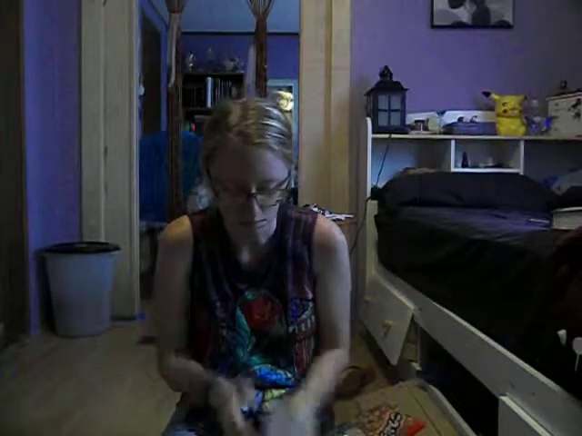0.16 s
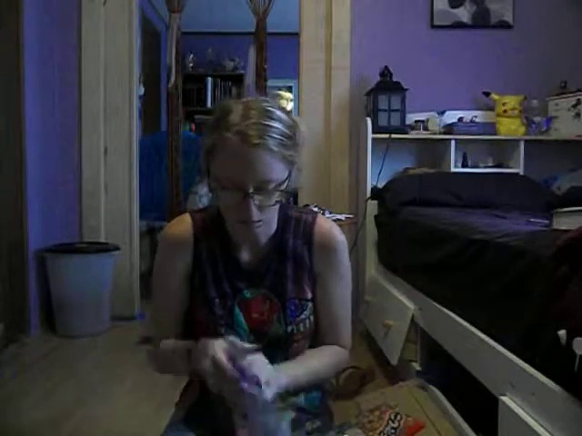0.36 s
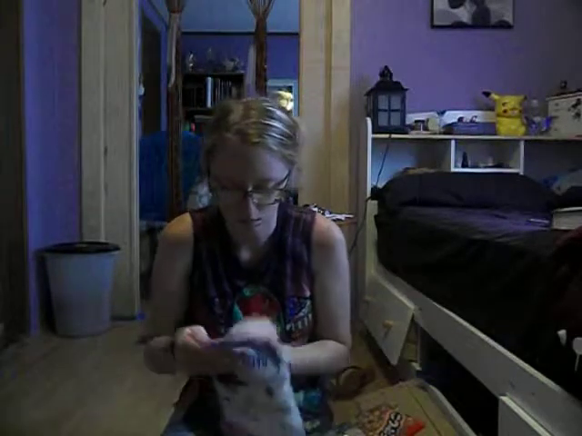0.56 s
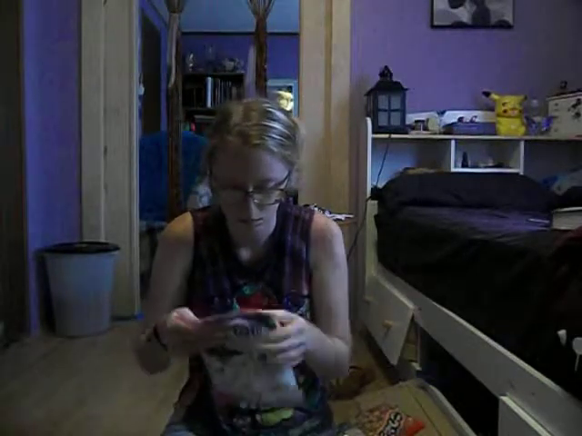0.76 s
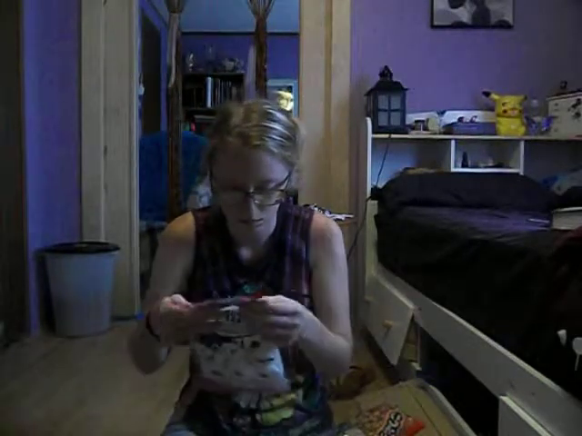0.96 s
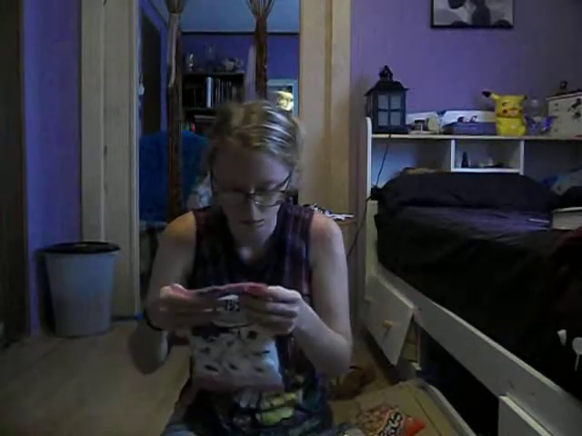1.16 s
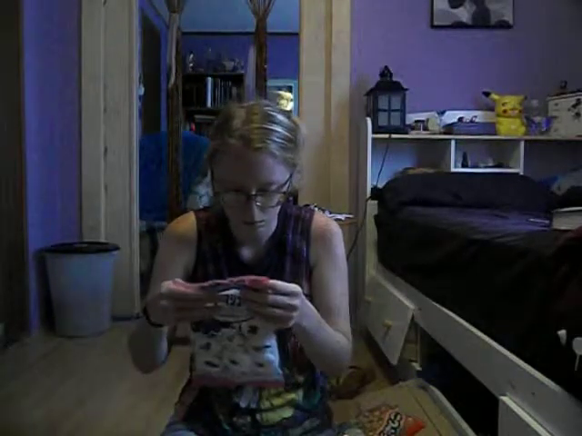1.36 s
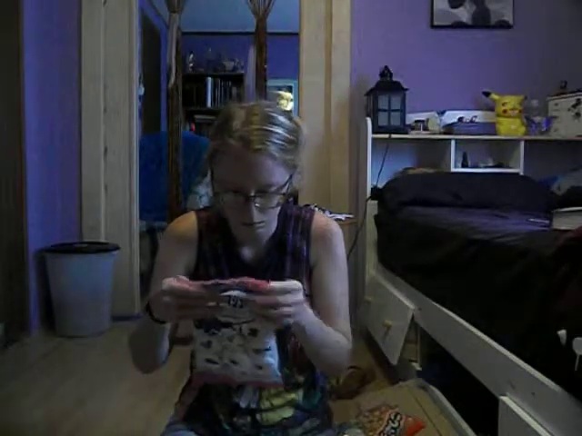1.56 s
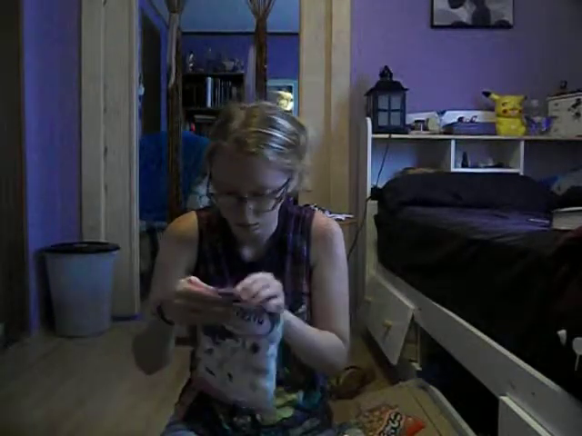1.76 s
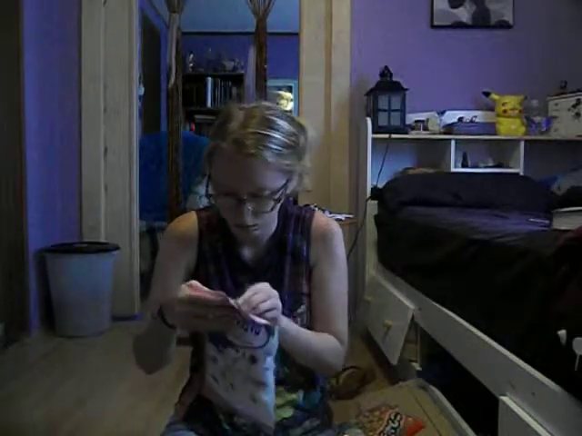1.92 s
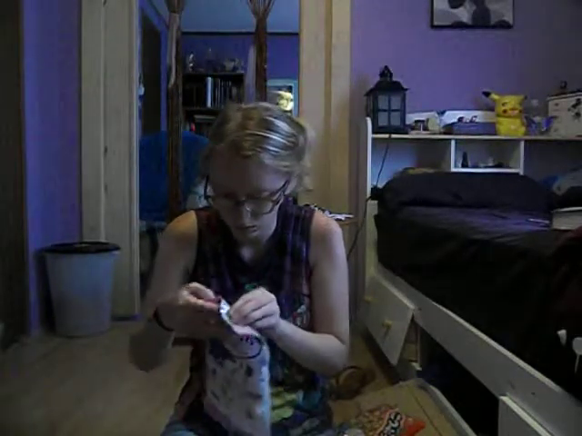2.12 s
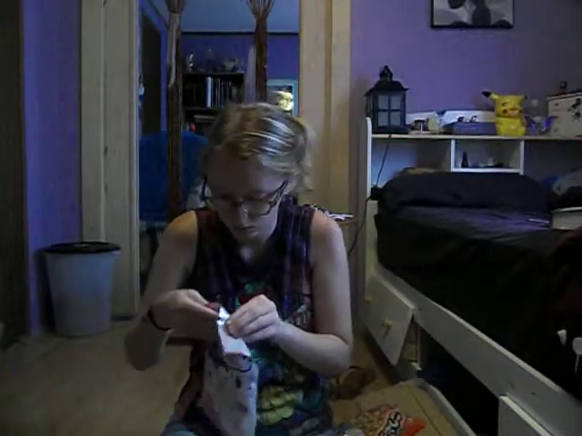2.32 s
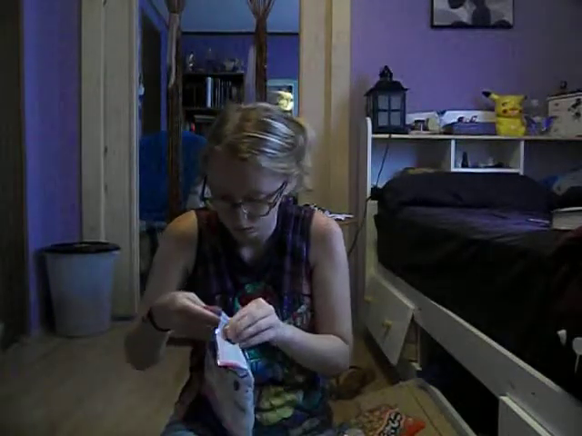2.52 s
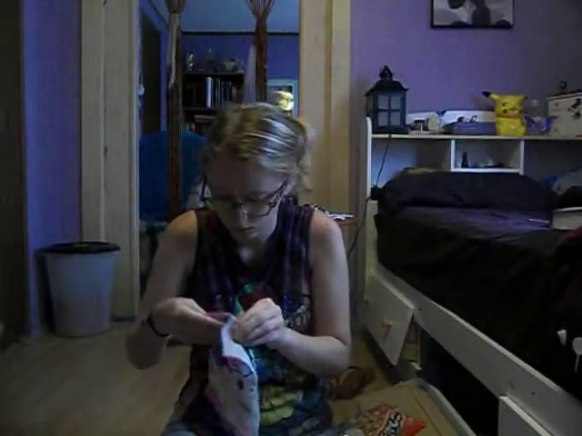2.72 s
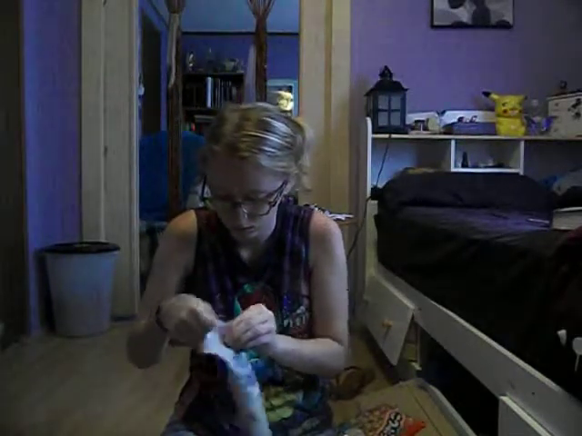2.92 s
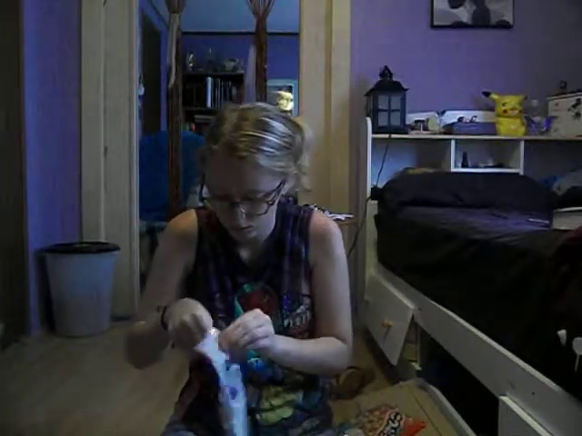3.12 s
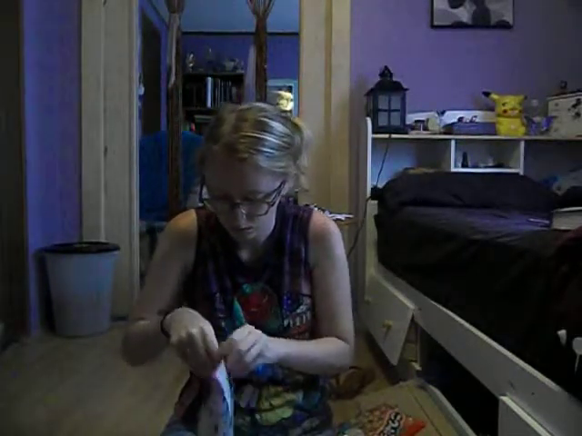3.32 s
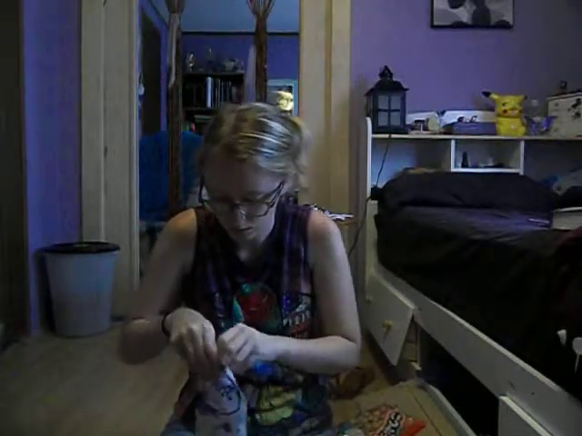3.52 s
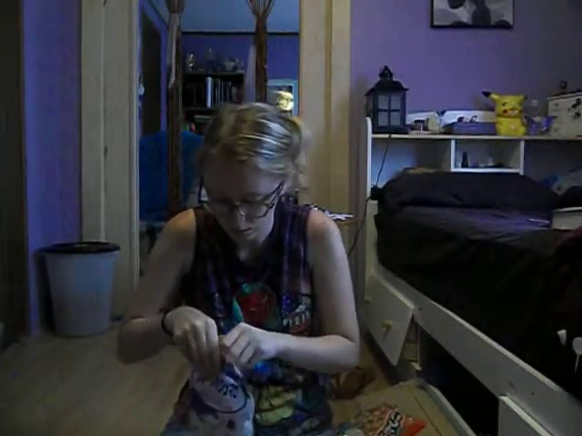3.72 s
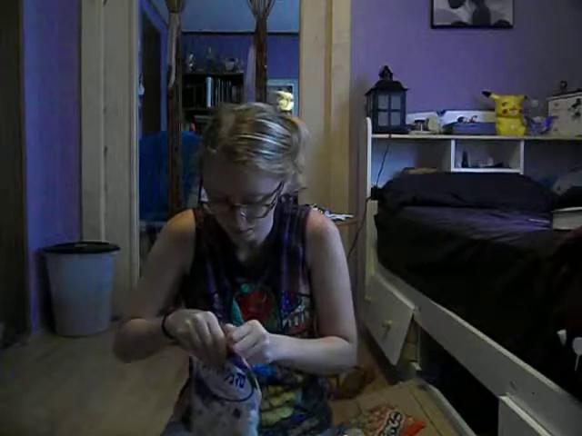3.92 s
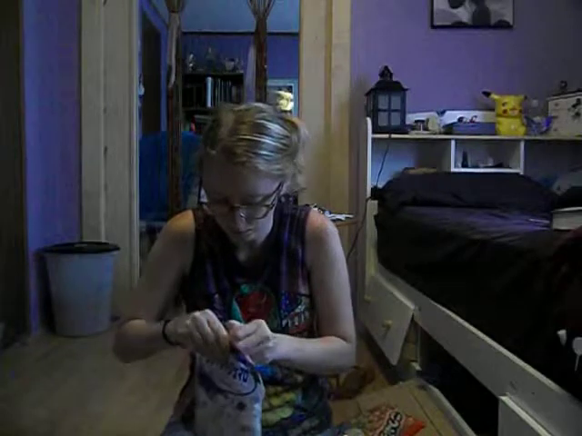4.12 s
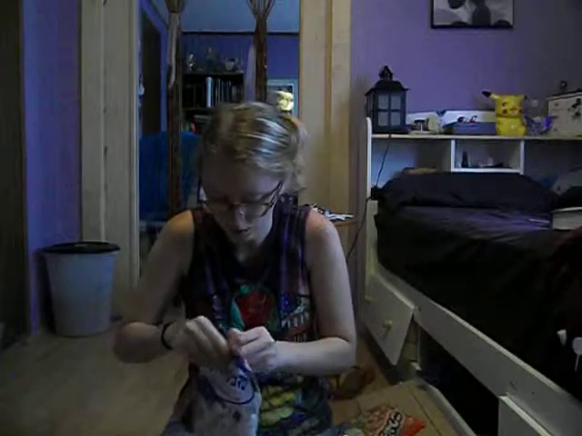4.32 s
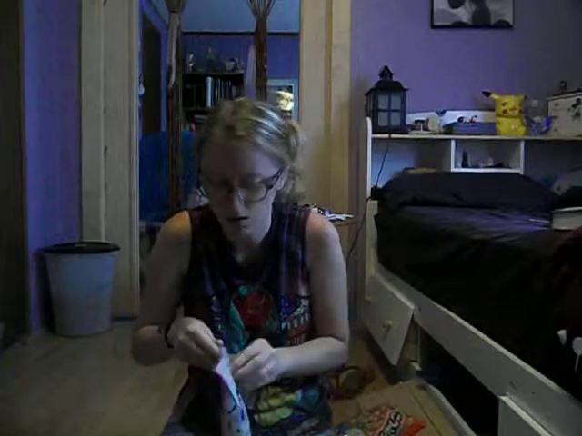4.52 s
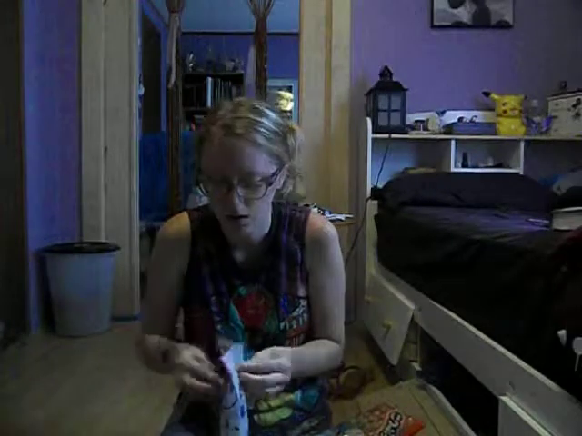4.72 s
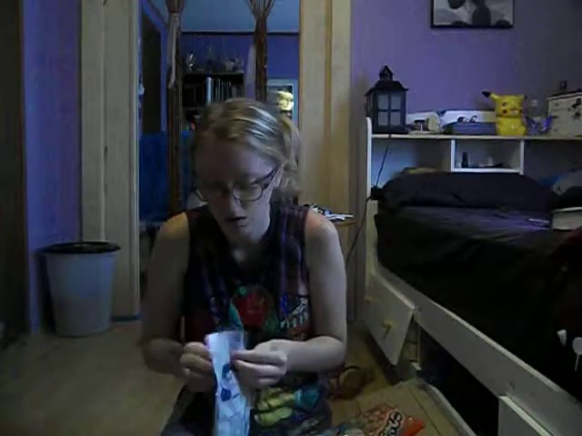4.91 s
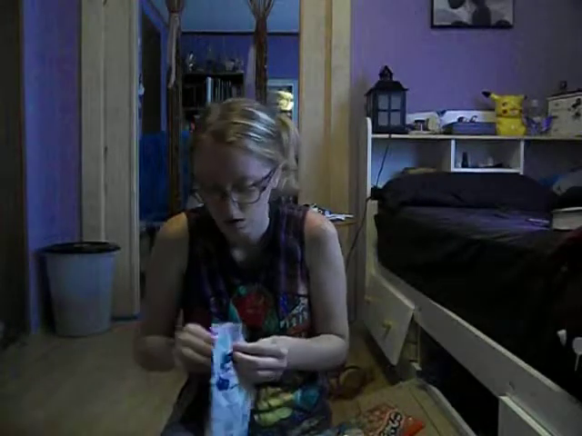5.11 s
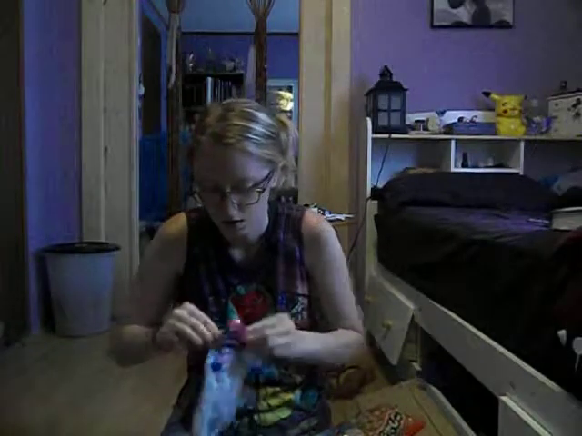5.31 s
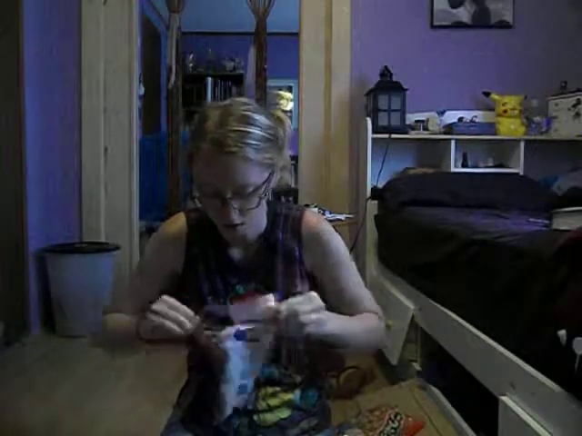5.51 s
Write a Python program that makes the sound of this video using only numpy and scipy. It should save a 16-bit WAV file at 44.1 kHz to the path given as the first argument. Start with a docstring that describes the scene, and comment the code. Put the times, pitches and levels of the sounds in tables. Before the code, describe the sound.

Hands crinkle a stiff plastic candy bag in a small room, sharp crackles pausing briefly after one second and peaking loudly at the end.

```python
"""Hands turn and pull at a stiff plastic candy bag in a small bedroom, a metre or two from a cheap camera.
Dense snaps and crackle open the scene, thin out after one second and return just before two.
Each is a noisy jolt that excites a film crease, a flat panel and the enclosed air; puffs and low thumps join in.
Handling is strongest in the last half second. The room rings briefly after the snaps, crackle and puffs;
steady hiss and rumble lie beneath throughout, and the camera narrows the band and clips the highest peaks."""
import sys
import numpy as np
from scipy import signal
from scipy.fft import rfft, irfft, next_fast_len
from scipy.io import wavfile
from scipy.ndimage import uniform_filter1d, map_coordinates

SR = 44100
rng = np.random.default_rng(int(sys.argv[2]) if len(sys.argv) > 2 else 0)


def generate_wav(sig):
    """Save sig (samples, or channels by samples) to the path in sys.argv[1] as 16-bit PCM at SR."""
    pcm = np.round(np.clip(np.atleast_2d(sig).T, -1, 1) * 32767).astype(np.int16)
    wavfile.write(sys.argv[1], SR, pcm)


N = 249735
SIZE, LEAD = 1024, 48  # samples in one short event, and those before a buckle starts

# Handling by the fingers: [t/s, crackle level/dB, panel level relative to the crease/dB]
HANDLING = [(0.0, -18, -10), (0.16, -21, -10.5), (0.6, -30.5, -12), (0.91, -41.5, -13), (1.1, -56.5, -5),
            (1.6, -63, 2), (1.85, -31.5, -10), (2.0, -41, -16), (2.28, -41, -11.5), (2.7, -31, -11),
            (3.05, -34, -8), (3.3, -39, -4.5), (3.95, -33.5, -10.5), (4.03, -42, -10), (4.13, -35, -12),
            (4.34, -40.5, -12), (4.57, -25, -9), (4.65, -38, -9.5), (4.81, -24, -8.5), (5.19, -37, -10.5),
            (5.24, -14, -14.5), (5.45, -28.5, -10), (5.53, -15, -11.5), (5.66, -22, -12.5)]
# Main resonance of the air inside the bag: [f/Hz, width/Hz]
BAG_AIR = (481, 288)


def amp(db):
    """Level definition: 20 dB is a factor of ten in amplitude."""
    return 10 ** (np.asarray(db) / 20)


def unit(x):
    """Normalisation to unit root-mean-square."""
    return x / np.sqrt(np.mean(x ** 2) + 1e-20)


def peak_one(rows):
    """Normalisation of each row to unit peak."""
    return rows / np.abs(rows).max(axis=1, keepdims=True)


def along(points, hz):
    """Interpolation of (f/Hz, value) points on a logarithmic frequency axis."""
    f, value = np.transpose(points)
    return np.interp(np.log(hz + 1), np.log(f + 1), value)


def filtered(x, response):
    """Linear filtering: the spectrum is multiplied by a response of frequency."""
    size = next_fast_len(N + 8192)
    hz = np.fft.rfftfreq(size, 1 / SR)
    return irfft(rfft(x, size) * response(hz), size)[..., :N]


def resonance(hz, centre_hz, width_hz):
    """Damped oscillator: the causal response of one mode, 1 at its centre."""
    damping = 1j * hz * width_hz
    return damping / (centre_hz ** 2 - hz ** 2 + damping)


def causal(gain):
    """Minimum phase: folding the cepstrum of a gain makes its response causal."""
    cepstrum = irfft(np.log(gain + 1e-6))
    cepstrum[1:SIZE // 2] *= 2
    cepstrum[SIZE // 2 + 1:] = 0
    return np.exp(rfft(cepstrum))


def scatter(s, sound):
    """Superposition: rows of sound add up, each starting at its time s in seconds."""
    start = np.round(s * SR).astype(int)[:, None]
    at = start + np.arange(SIZE) + SIZE  # a margin of SIZE samples ahead of time zero
    return np.bincount(at.ravel(), sound.ravel(), N + 3 * SIZE)[SIZE:SIZE + N]


def camera_floor():
    """Stationary noise: random samples coloured into the hiss and rumble of the camera and the house."""
    # Spectral shape of the noise floor: [f/Hz, relative level per Hz/dB]
    hiss_shape = [(15, -4.5), (30, 2), (60, -3), (130, -9), (300, -17.5), (1000, -19.5), (3000, -24),
                  (5500, -30.5), (7500, -24), (8000, -46.5), (9000, -56.5)]
    noise = rng.standard_normal(N)
    coloured = filtered(noise, lambda hz: amp(along(hiss_shape, hz)))
    return amp(-54) * unit(coloured)


def bright_tail(x):
    """Diffuse decay: each treble band stores and leaks energy, heard as noise of the same broad colour."""
    # Reverberation time of the room: [f/Hz, t60/s]
    decay_times = [(1000, 0.23), (3000, 0.23), (5000, 0.26), (8000, 0.076)]
    hz, t, spectrum = signal.stft(x, SR, nperseg=128)
    power = uniform_filter1d(np.abs(spectrum) ** 2, size=2, axis=0)
    keep = amp(-60 * t[1] / along(decay_times, hz)) ** 2  # share of stored energy left after one frame
    stored = np.array([signal.lfilter([1 - k], [1, -k], p) for k, p in zip(keep, power)])
    noise = signal.stft(rng.standard_normal(N), SR, nperseg=128)[2]
    noise /= np.sqrt(np.mean(np.abs(noise) ** 2))
    return signal.istft(noise * np.sqrt(np.abs(stored)), SR, nperseg=128)[1][:N]


def low_tail(x, t60, step=8192):
    """Reverberation by convolution: low notes ring on through decaying noise, redrawn every step samples."""
    out = np.zeros(N + SR)
    t = np.arange(SR // 4) / SR
    for start in range(0, N, step):
        tail = rng.standard_normal(len(t)) * amp(-60 * t / t60)
        wet = signal.fftconvolve(x[start:start + step], tail / np.linalg.norm(tail))
        out[start:][:len(wet)] += wet
    return out[:N]


def room(x, bright_db, low_db):
    """Room response: direct sound and early reflections, then a diffuse tail in two bands."""
    # Reflections from the floor and near wall: [delay/s, level/dB]
    reflections = [(.0045, -15), (.009, -25.5)]
    out = np.pad(x, (0, SR))
    for delay, db in reflections:
        out[round(delay * SR):][:N] += amp(db) * x
    late = np.pad(x, (round(0.00461 * SR), 0))[:N]  # the tail starts 4.61 ms after the direct sound

    def low(hz):
        return 1 / (1 + (hz / 900) ** 12)  # the bands cross at 900 Hz

    bright = filtered(bright_tail(late), lambda hz: 1 - low(hz))
    deep = filtered(low_tail(late, t60=0.17), low)
    return out[:N] + amp(bright_db) * bright + amp(low_db) * deep


def thumps():
    """Low thumps as pressure pulses: one soft low push each, without a ring."""
    # Low thumps: [t/s, level/dB]
    low_pushes = [(0.415, -39), (3.862, -29), (5.256, -39), (5.293, -42.5), (5.35, -33), (5.483, -22.5)]
    s, db = np.transpose(low_pushes)
    centre = 200  # samples from the row start to the middle of the push
    u = (np.arange(SIZE) - centre) / SR / 0.00041  # time in widths of 0.41 ms
    push = -(1 - 0.23 * u) * np.exp(-u ** 2 / 2)
    return scatter(s - centre / SR, amp(db)[:, None] * push)


def air_share(s):
    """Source balance: how far the worked air stands above the finger crackle at time s, in dB."""
    # How hard the air in the bag is worked: [t/s, level/dB]
    air_work = [(0.0, -35), (0.19, -46), (1.06, -54.5), (1.12, -59.5), (1.5, -61), (1.97, -43),
                (2.0, -52.5), (3.01, -48), (3.03, -45), (3.09, -57), (3.92, -47), (4.3, -62.5), (4.54, -48),
                (5.11, -54), (5.55, -41.5), (5.66, -42)]
    when, crackle_db, _ = np.transpose(HANDLING)
    return np.interp(s, *np.transpose(air_work)) - np.interp(s, when, crackle_db)


def puffs():
    """Cavity oscillation: a squeeze swings the enclosed air for a few cycles, swelling and fading softly."""
    # Squeezes of the bag: [t/s, envelope peak level/dB]
    squeezes = [(0.52, -35), (0.562, -34.5), (0.877, -38), (0.958, -36), (1.027, -38), (1.849, -32),
                (1.964, -29.5), (2.303, -36), (2.777, -34.5), (2.828, -37), (2.964, -33.5), (3.026, -31.5),
                (5.365, -30), (5.392, -35), (5.528, -23.5), (5.557, -26.5), (5.642, -33)]
    s, db = np.transpose(squeezes)
    t = (np.arange(SIZE) - SIZE // 2) / SR
    draw = rng.standard_normal((len(s), 2))
    air_hz = BAG_AIR[0] * np.exp(0.095 * draw[:, :1])
    phase = draw[:, 1:]
    swing = np.exp(-(t / 0.0041) ** 2) * np.sin(2 * np.pi * air_hz * t + phase)
    return scatter(s + t[0], amp(db)[:, None] * swing)


def buckles(s, db, crease_hz, panel_db, burst_ms, air_db, sharp):
    """Buckling: a short noisy jolt excites the modes of a crease (Q = sharp), a flat panel and the air."""
    # Film heard through the microphone: [f/Hz, relative level per Hz/dB]
    film_colour = [(400, -21.5), (850, -37), (1150, -6), (1600, -22.5), (2100, -14.5), (2700, -9),
                   (3700, 0), (4500, -1), (5600, -0.5), (6700, -4.5), (7500, -8), (7950, -31.5),
                   (8800, -22.5), (10000, -69)]
    hz = np.fft.rfftfreq(SIZE, 1 / SR)
    t = np.maximum(np.arange(SIZE) - LEAD, 0) / SR
    draw = rng.standard_normal((len(s), SIZE + 1))

    envelope = amp(-60 * 1000 * t / burst_ms[:, None]) * (1 - np.exp(-t / 0.0002))  # 0.2 ms rise
    jolt = rfft(draw[:, 1:] * envelope)
    jolt /= np.sqrt(np.abs(uniform_filter1d(np.abs(jolt) ** 2, size=25, axis=1)))  # favours no band

    crease_mode = resonance(hz, crease_hz[:, None], crease_hz[:, None] / sharp)
    crease = causal(amp(along(film_colour, hz))) * (0.5 + crease_mode)
    panel_hz = 1850 * np.exp(0.072 * draw[:, :1])  # panels differ in size
    panel = resonance(hz, panel_hz, 1.254 * panel_hz) ** 3
    shake = np.roll(jolt, 1, axis=0)  # another buckle's jolt keeps the panel out of step with the crease
    bag_flap = amp(-2.5) * resonance(hz, 410, 370)  # the whole bag also flaps a little
    air = resonance(hz, *BAG_AIR) ** 3 + bag_flap

    sound = peak_one(irfft(jolt * crease))
    sound = sound + amp(panel_db)[:, None] * peak_one(irfft(shake * panel))
    sound = sound + amp(air_db)[:, None] * peak_one(irfft(jolt * air))
    return scatter(s - LEAD / SR, amp(db)[:, None] * sound)


def crackle(count=3000):
    """Random superposition: many small creases buckle in clumps under the fingers, most of them weak."""
    when, level_db, panel_db = np.transpose(HANDLING)
    s = rng.uniform(0, N / SR, count)
    hand_db = np.interp(s, when, level_db)
    clump = map_coordinates(rng.standard_normal(400), [s * 45])  # smooth random curve, 45 points a second
    size_db = 4 * rng.exponential(size=count) + 3.35 * clump
    size_db = np.minimum(size_db, 14) - 4  # at most 10 dB above the handling level
    crease_hz = 4800 * np.exp(0.24 * rng.standard_normal(count))
    burst_ms = 2.89 * np.exp(0.56 * rng.standard_normal(count))  # t60
    return buckles(s, hand_db + size_db, crease_hz, np.interp(s, when, panel_db), burst_ms,
                   air_share(s), sharp=7.9)


def snaps():
    """Snap-through instability: large creases give way; the louder, the more sudden."""
    # The clearest snaps: [t/s, crease peak level/dB, crease f/Hz, panel level relative to the crease/dB]
    large_creases = [(0.0302, -13, 4780, -8), (0.0572, -7, 4690, -23), (0.0784, -5, 4320, -13),
                     (0.0891, -8.5, 4830, -4.5), (0.1106, -12, 4650, -19), (0.1403, -10.5, 3430, -14),
                     (0.185, -13.5, 5170, -2), (0.2473, -18, 4400, -5.5), (0.3355, -13.5, 5590, -12),
                     (0.3434, -14.5, 4510, -18), (0.397, -20.5, 4930, -28), (0.408, -7.5, 5400, -14),
                     (0.4324, -18.5, 5190, -15), (0.4549, -17.5, 4070, -13), (0.5403, -14, 4090, -8),
                     (0.5484, -13, 5240, -8), (0.5592, -16, 5790, -5), (0.5936, -10, 5580, -20),
                     (0.6069, -21, 5910, -4.5), (0.6425, -14.5, 4050, -8.5), (0.6511, -10.5, 6320, -17),
                     (0.6881, -3.5, 5900, -17), (0.7262, -15, 4440, -27), (0.7713, -11.5, 4280, -10),
                     (0.867, -15, 3950, -4), (0.9541, -13, 4300, -6.5), (1.0232, -14.5, 4140, -15),
                     (1.0783, -25, 4360, -10), (1.1987, -43.5, 3990, 8.5), (1.307, -33, 3830, -11),
                     (1.6185, -26, 4030, -8.5), (1.6568, -25.5, 5200, -3.5), (1.6933, -29.5, 4200, -1),
                     (1.763, -24.5, 3960, -12.5), (1.8309, -17.5, 5500, -6), (1.8473, -13, 3840, -7.5),
                     (1.861, -23, 4510, -13), (1.8874, -7.5, 5600, -14), (1.9017, -4, 4300, -21),
                     (1.9461, -11.5, 6000, -11), (1.96, -14, 4460, -6), (2.0242, -16.5, 4050, -9.5),
                     (2.0418, -21, 4800, -3), (2.0911, -21.5, 4270, -8), (2.1369, -15.5, 5400, -8),
                     (2.2056, -16.5, 5430, -23), (2.2254, -16, 4040, -13), (2.2752, -17.5, 5380, -9),
                     (2.2987, -20.5, 5360, -3.5), (2.3628, -22, 4400, -11), (2.4005, -3.5, 5730, -20),
                     (2.4354, -15.5, 5230, -7), (2.443, -10, 4340, -11.5), (2.5228, -16.5, 5450, -11.5),
                     (2.5438, -21, 5900, -9), (2.5604, -21, 4760, -13), (2.575, -24, 3730, -4),
                     (2.6423, -9.5, 4130, -15), (2.684, -7.5, 6900, -21), (2.7022, -11.5, 5300, -15.5),
                     (2.7067, -14, 5920, -17), (2.7147, -13, 5500, -13), (2.7204, -15, 5460, -14),
                     (2.7274, -13, 5410, -12), (2.7321, -14, 4940, -21), (2.7655, -12.5, 4910, -15),
                     (2.7998, -17.5, 4030, -10), (2.822, -20, 5860, -8), (2.8435, -23, 4290, -13),
                     (2.8688, -14.5, 6400, -15), (2.8875, -20, 3720, -10), (2.9034, -7, 4700, -12),
                     (2.928, -16, 4500, -10), (2.9918, -24, 3780, -20), (3.0169, -10, 4500, -13),
                     (3.0218, -0.5, 4370, -19.5), (3.0745, -7, 5100, -7.5), (3.1304, -12.5, 6480, -13),
                     (3.1657, -10, 5460, -23), (3.1766, -12, 5640, -17), (3.3292, -12, 5490, -20),
                     (3.3314, -9, 4100, -5), (3.3833, -11.5, 5370, -7.5), (3.3938, -13.5, 4560, -7),
                     (3.4123, -13, 4370, -13), (3.4463, -10.5, 5630, -36), (3.4654, -18.5, 5690, -29),
                     (3.5523, -18.5, 3830, -15), (3.5658, -18.5, 4340, -10), (3.6107, -16, 5940, -14),
                     (3.657, -16, 3700, -12), (3.7168, -25, 3780, -1.5), (3.7399, -17.5, 4570, -5.5),
                     (3.8551, -18.5, 4470, -7), (3.901, -18, 5070, -5.5), (3.9168, -6, 4360, -13.5),
                     (3.9851, -24, 5100, -4), (4.0814, -19, 3850, -5), (4.094, -26.5, 4320, -9),
                     (4.1046, -23, 4310, -11), (4.1154, -14, 4280, -6), (4.1263, -9, 4050, -7),
                     (4.152, -19, 6530, -26), (4.1964, -15, 5870, -21), (4.2067, -11.5, 4400, -14),
                     (4.2547, -25, 4360, -7), (4.2767, -17, 5600, -31), (4.2804, -0.5, 5370, -35),
                     (4.3999, -14, 3570, -11.5), (4.4314, -20.5, 3930, -7.5), (4.4949, -13, 5200, -11.5),
                     (4.5193, -14, 6000, -15), (4.5496, -7, 5540, -13), (4.5598, -14.5, 5340, -14),
                     (4.586, -9, 4650, -22), (4.6914, -11, 4600, -9.5), (4.7313, -13.5, 4730, -29),
                     (4.7641, -6.5, 6800, -14.5), (4.804, -17, 4300, -7), (4.8724, -2.5, 4450, -20),
                     (4.938, -2.5, 5530, -18), (4.994, -9.5, 5300, -12.5), (5.0263, -6.5, 4600, -20.5),
                     (5.0447, -12, 4470, -8.5), (5.0991, -17.5, 7000, -9), (5.1173, -15.5, 4650, -11.5),
                     (5.1916, -23, 3690, -12), (5.2066, -15.5, 5800, -9), (5.242, -4, 4180, -11.5),
                     (5.289, -5, 6950, -15), (5.2941, 0.5, 4100, -29), (5.3403, -18, 4820, -6),
                     (5.3507, -2.5, 5240, -10), (5.389, -11.5, 4250, -13), (5.4028, -8, 4580, -9),
                     (5.417, -6.5, 4000, -12.5), (5.4349, -6, 3810, -20.5), (5.4432, -2, 5400, -23),
                     (5.4827, 5.5, 4050, -15), (5.486, 1, 3830, -13), (5.5082, -1.5, 4000, -6),
                     (5.5254, 0.5, 5100, -11), (5.554, -4.5, 4200, -15), (5.6411, -11.5, 5330, -8)]
    s, db, crease_hz, panel_db = np.transpose(large_creases)
    full_scale_ms, shorter_per_db = 6.9, 0.38  # typical t60 at 0 dB; dB shorter per dB louder
    spread = np.exp(0.14 * rng.standard_normal(len(s)))
    burst_ms = full_scale_ms * amp(-shorter_per_db * db) * spread
    air_db = -18 + air_share(s)  # a snap stirs the air less than the crackle does, for its size
    return buckles(s, db, crease_hz, panel_db, burst_ms, air_db, sharp=3.3)


def scene():
    """Superposition of the bag in its room, the dry thumps and the steady noise floor."""
    bag = snaps() + crackle() + puffs()
    return (room(bag, bright_db=-5.0, low_db=-9.0) + thumps() + camera_floor())[None]


def record(dry):
    """Band limiting and saturation: the camera keeps a narrow band, then clips peaks at full scale."""
    narrow = filtered(dry, lambda hz: 1 / (1 + (hz / 8850) ** 60))
    clipped = np.clip(narrow, -1, 1)
    return filtered(clipped, lambda hz: 1 / (1 + (hz / 16000) ** 40))  # trims the clipping products


dry = scene()
out = record(dry)
generate_wav(out)
```